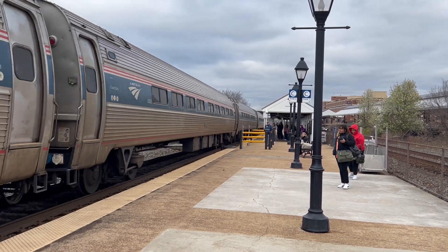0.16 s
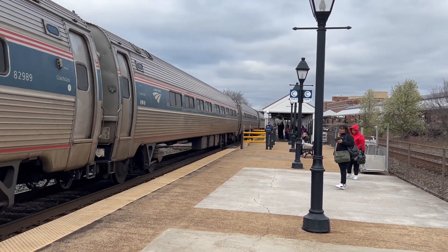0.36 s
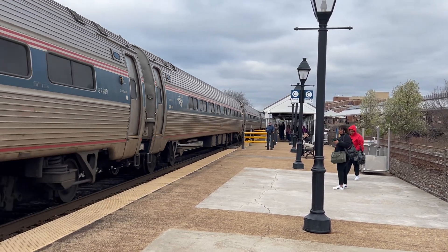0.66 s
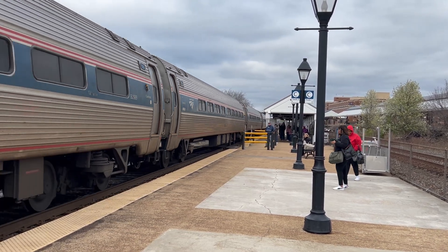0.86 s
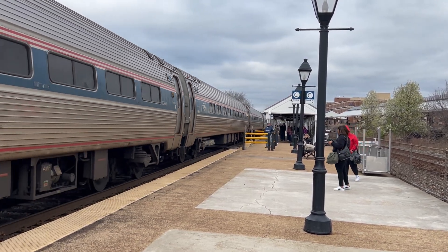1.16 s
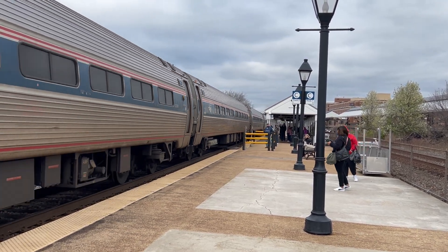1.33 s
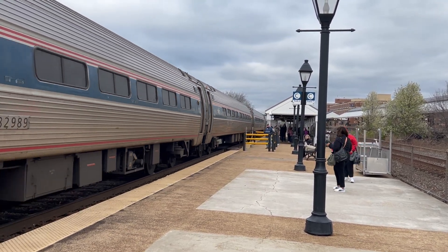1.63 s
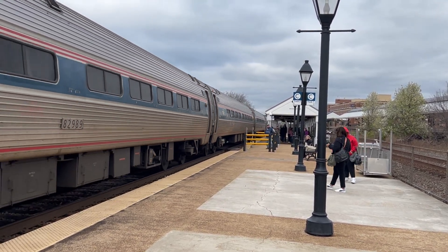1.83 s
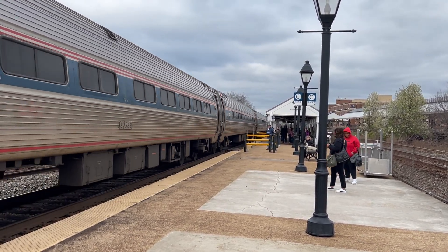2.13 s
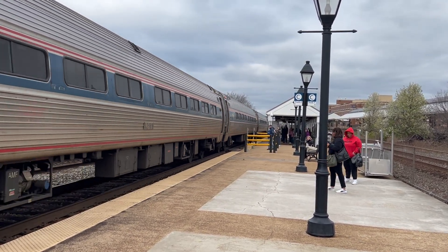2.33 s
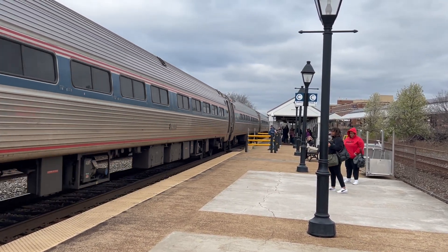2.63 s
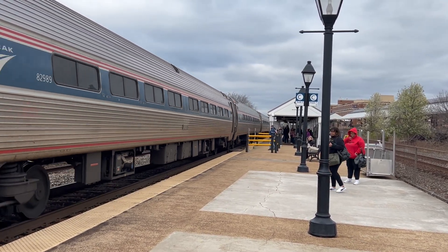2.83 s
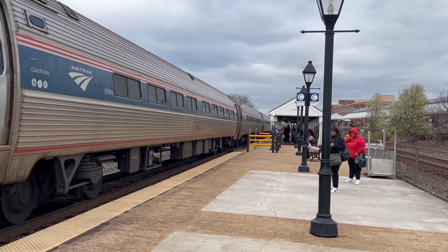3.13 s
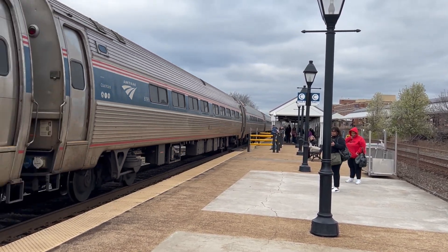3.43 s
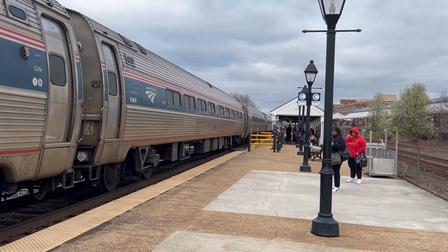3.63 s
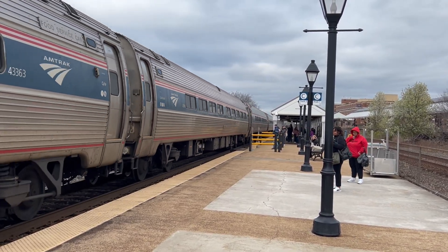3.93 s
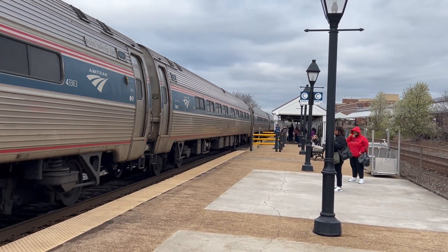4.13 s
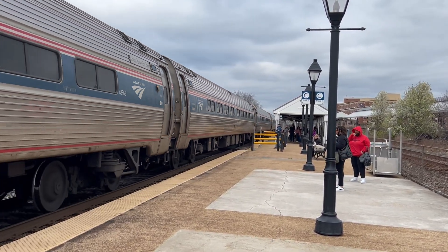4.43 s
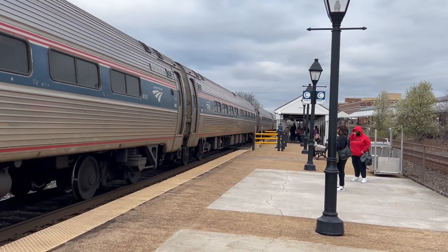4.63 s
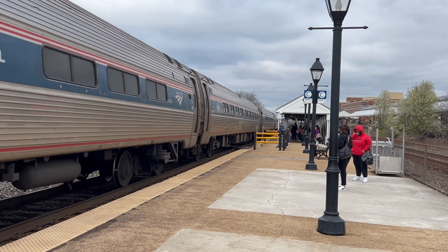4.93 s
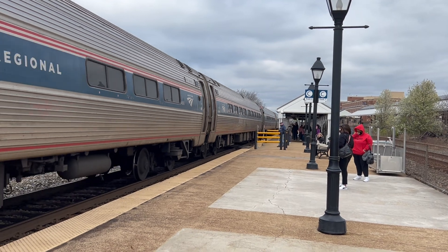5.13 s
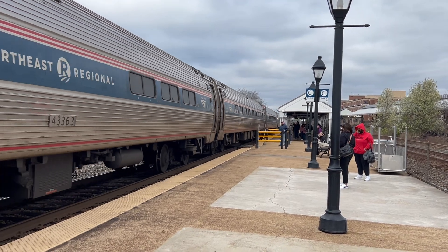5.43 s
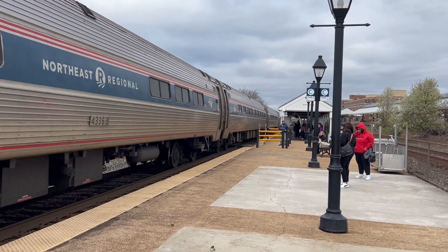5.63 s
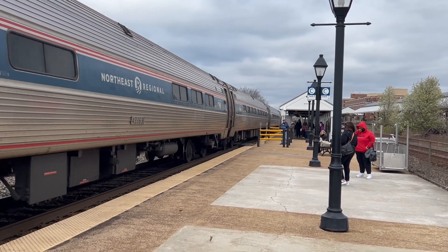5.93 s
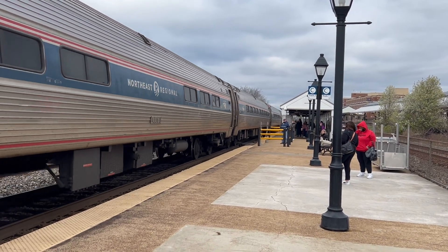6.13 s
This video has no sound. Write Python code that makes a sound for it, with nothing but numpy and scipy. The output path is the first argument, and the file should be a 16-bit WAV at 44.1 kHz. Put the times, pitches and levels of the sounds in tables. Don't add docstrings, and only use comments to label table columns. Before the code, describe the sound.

Close stereo phone pickup on an open station platform as passenger coaches roll slowly past with brakes on. From 0 s a low, two-toned groan around 350 Hz wavers over track rumble, a faint machine hum and short whistles near 13 kHz, with tiny ticks. A heavy knock falls at 0.9 s. From 1.3 s axles approach; between 1.5 and 2.7 s knocks and deep thumps crowd together, the groan swells and sings, a flange rasps, and wheels ring and hiss brightest around 2 s. After 3 s the blows thin out and rumble eases; squeal continues until about 4 s. Small steel parts rattle evenly from 3.6 to 4.2 s. At 4.3 s a brake shoe grabs with a harsh half-second-or-shorter rasp. From 4.5 s bright pads drag and scrape with brief high rings, scattered joint clunks at 5, 5.5 and 5.8 s, and a weak groan continuing to the end at 6.3 s.

```python
import sys
import numpy as np
from scipy import signal
from scipy.fft import rfft, irfft, next_fast_len
from scipy.io import wavfile
from scipy.ndimage import uniform_filter1d, map_coordinates

SR = 44100
rng = np.random.default_rng(int(sys.argv[2]) if len(sys.argv) > 2 else 0)


def int16_out(signal):
    q = np.round(np.clip(np.atleast_2d(signal).T, -1, 1) * 32767)
    wavfile.write(sys.argv[1], SR, q.astype(np.int16))


def amplitude_ratio(level_db):
    exponent = np.asarray(level_db, float) / 20
    return 10 ** exponent


N = 276948
# f/Hz, density/dB
GROUND_SPECTRUM = [(8, -90), (20, -40), (32, -28), (50, -5), (80, 0), (120, -4), (170, -11.5), (260, -48),
                   (500, -110)]
# t/s, length/s, level/dB
SHOE_GRABS = [
    (4.28, 0.19, -34),
]


def unit(x):
    return x / np.sqrt(np.mean(np.abs(x) ** 2) + 1e-20)


def along(points, hz):
    f, v = np.transpose(points)
    return np.interp(np.log(hz + 1), np.log(f + 1), v)


def curves(rows):
    s, *cols = np.transpose(rows)
    return [np.interp(np.arange(N) / SR, s, c) for c in cols]


def wobble(rate):
    return map_coordinates(rng.standard_normal(4000), [np.arange(N) * rate / SR], mode="wrap")


def filtered(x, response):
    m = next_fast_len(N + 8192)
    return irfft(rfft(x, m) * response(np.fft.rfftfreq(m, 1 / SR)), m)[..., :N]


def shape(points):
    return lambda hz: amplitude_ratio(along(points, hz))


def modes(table):
    def response(f):
        total = 0
        for k, (center, width, db) in enumerate(table):
            resonance = 1j * f * width / (center * center - f * f + 1j * f * width)
            total = total + (-1) ** k * amplitude_ratio(db) * resonance
        return total
    return response


def steep(table):
    return lambda f: modes(table)(f) ** 2


def rush(response, flutter_db=0, rate=1):
    return unit(amplitude_ratio(flutter_db * wobble(rate)) * filtered(rng.standard_normal((2, N)), response))


def fuzzy(hz, width_hz):
    swing = filtered(rng.standard_normal((4, N)), lambda f: 1 / (1 + (2 * f / width_hz) ** 2))
    turn = 2 * np.pi * np.cumsum(hz) / SR
    return unit(swing[:2] * np.cos(turn) + swing[2:] * np.sin(turn))


def mottled(x, patchy_db):
    z = signal.stft(x, nperseg=512)[2]
    field = uniform_filter1d(rng.standard_normal(z.shape[1:]), size=7, axis=0)
    field = uniform_filter1d(field, size=9, axis=1)
    return unit(signal.istft(z * amplitude_ratio(patchy_db * unit(field)), nperseg=512)[1][:, :N])


def held(rows, attack_db_s, release_db_s):
    t, gain = np.arange(N) / SR, 0
    for s, length, db in rows:
        early, late = np.clip(s - t, 0, None), np.clip(t - s - length, 0, None)
        gain = gain + amplitude_ratio(db - attack_db_s * early - release_db_s * late)
    return gain


def bursts(times, peaks_db, t60, rise):
    out, t = np.zeros(N + SR), np.arange(SR // 2) / SR
    for s, db in zip(times, peaks_db):
        out[round(s * SR):][:len(t)] += amplitude_ratio(db - 60 * t / max(t60, .01)) * (1 - np.exp(-t / rise))
    return out[:N]


def passing(column, far_db):
    # closest t/s, tread hiss level/dB, disc ring level/dB, pad scrape level/dB
    axles = [
        (1.3, -57, -49.5, -65),
        (1.63, -43, -43.5, -62),
        (2.02, -41, -36, -67),
        (2.6, -45.5, -41, -62.5),
        (3.2, -54, -49, -63),
        (3.75, -73, -51, -74),
        (4.3, -46, -42, -54.5),
        (5.0, -49, -63, -55),
        (5.5, -47, -51.5, -55.5),
    ]
    t, nearing_s, leaving_s = np.arange(N) / SR, 0.12, 0.78
    power = amplitude_ratio(2 * far_db)
    for row in axles:
        away = (t - row[0]) / np.where(t < row[0], nearing_s, leaving_s)
        power = power + amplitude_ratio(2 * row[column]) / (1 + away ** 2) ** 2
    return np.sqrt(power)


def groan():
    # t/s, first f/Hz, second f/Hz
    pad_pitch = [(0, 348, 362), (1.2, 342, 366), (1.6, 345, 357), (2.25, 332.5, 356), (2.8, 331.5, 356.5),
                 (3.5, 340, 358), (4.9, 338, 359), (6.28, 339, 350)]
    # t/s, pad pressure level/dB, first pad's part/dB, unevenness of the slip cycle/dB
    pad_grip = [(0.0, -39, 1, 1), (0.09, -29.5, 4, -3), (0.16, -38.5, 2.5, -4.5), (1.08, -33, -1.5, -7.5),
                (1.71, -28, -0.5, 2), (1.82, -29.5, -2, -1.5), (2.08, -24.5, 0, -1.5),
                (2.17, -38.5, -1, 10), (2.29, -24, -0.5, -6.5), (2.37, -22, 9, -2), (2.52, -24.5, 2, -7.5),
                (2.68, -22.5, -1.5, -8), (2.92, -29, -3, -3.5), (3.45, -33.5, -2.5, -7),
                (5.04, -34.5, 7, -3.5), (5.16, -45, -2.5, 0), (6.1, -33.5, 0.5, -6), (6.28, -37, 14, -3.5)]
    # t/s, length/s, level/dB
    bites = [
        (0, 0.99, -42.5),
        (1.25, 0.028, -38),
        (1.6, 0.052, -29.5),
        (2.34, 0.053, -30),
        (2.47, 0.17, -33.5),
        (2.72, 0.032, -35),
        (3.62, 0.16, -44),
        (4.38, 0.05, -41.5),
        (5.3, 0.065, -48.5),
        (5.5, 0.027, -58),
    ]
    # t/s, length/s, level/dB
    singing = [
        (1.24, 0.37, -44),
        (2.02, .1, -56),
        (2.35, 0.63, -44),
        (3.15, 0.25, -51.5),
        (4.25, 0.34, -60),
    ]

    def pad(hz):
        drift = np.array([.75 * wobble(6) + .2j * wobble(5) for _ in "lr"])
        slip_hz = hz + 3.5 * wobble(3)
        return np.exp(1j * (2 * np.pi * np.cumsum(slip_hz) / SR + drift))

    def fade():
        return amplitude_ratio(4 * wobble(7))

    first_hz, second_hz = curves(pad_pitch)
    first, second = pad(first_hz), pad(second_hz)
    pressure_db, part_db, uneven_db = curves(pad_grip)
    part = np.clip(amplitude_ratio(part_db), .05, .998)
    other = np.sqrt(1 - part ** 2)
    share = 1 / (1 + amplitude_ratio(10.5) * (other / part) ** 0.43)
    cycle = (share * first + (1 - share) * second) / np.hypot(share, 1 - share)
    slips = fade() * (share * first) ** 2
    slips = slips + fade() * first * second / 2
    slips = slips + fade() * ((1 - share) * second) ** 2
    octave_db = pressure_db + uneven_db
    twelfth_db = pressure_db + 0.88 * uneven_db - 12.5 + wobble(8.9)

    near = amplitude_ratio(pressure_db - 0.5) * (part * first + other * second)
    near += amplitude_ratio(octave_db - 2.0) * unit(slips.real)
    near += amplitude_ratio(twelfth_db - 2.0) * unit((cycle * second ** 2).real)
    near += held(bites, attack_db_s=163, release_db_s=143) * np.sqrt(2) * first * second
    near += held(singing, attack_db_s=120, release_db_s=82) * np.sqrt(2) * first * second ** 2
    mean_hz = (first_hz + second_hz) / 2
    far = amplitude_ratio(pressure_db - 1.5) * fuzzy(mean_hz, width_hz=43.6)
    far += amplitude_ratio(octave_db - 1) * fuzzy(2 * mean_hz, width_hz=68)
    far += amplitude_ratio(twelfth_db) * fuzzy(3 * mean_hz, width_hz=93)
    return near.real + far


def disc_squeal():
    # t/s, length/s, level/dB
    squeals = [(0.06, 0.1, -48), (.3, 0.14, -53.5), (.62, 0.15, -51.5), (.94, 0.11, -51), (1.12, 0.1, -58),
               (1.3, 0.13, -50.5), (1.54, 0.26, -50.5), (1.9, 0.17, -61), (2.24, 0.52, -47.5),
               (2.88, 0.11, -53.5), (3.44, 0.46, -50), (3.94, 0.094, -59)]
    hz = np.full(N, 13163.)
    whistle = amplitude_ratio(3.0) * fuzzy(hz, width_hz=16)
    chatter = amplitude_ratio(3.5) * fuzzy(hz - 150, width_hz=360)
    return held(squeals, attack_db_s=142, release_db_s=132) * (whistle + chatter)


def pads():
    # f/Hz, density/dB
    friction = [(400, -90), (1500, -41), (3000, -4.5), (5000, 1), (7000, 4), (9500, 2), (12300, -9),
                (14000, -10.5), (15500, -9)]
    # t/s, length/s, level/dB
    rotor_rings = [
        (4.5, 0.073, -42.5),
        (4.69, 0.059, -40),
        (5.0, 0.08, -41.5),
        (5.3, 0.06, -42),
        (5.42, 0.091, -45.5),
        (5.6, 0.042, -48),
    ]
    # t/s, length/s, level/dB
    drags = [
        (4.52, 0.13, -45.5),
        (4.93, 0.097, -50),
        (5.33, 0.11, -53),
    ]
    bright = lambda f: shape(friction)(f) * modes([(12500, 2800, 0)])(f)
    scrape = passing(column=3, far_db=-65.5) * amplitude_ratio(8.0) * mottled(rush(shape(friction), rate=15), patchy_db=3.0)
    drag = held(drags, attack_db_s=65, release_db_s=41) * rush(bright, flutter_db=1.4, rate=25)
    rotor = held(rotor_rings, attack_db_s=302, release_db_s=194) * fuzzy(6560 + 60 * wobble(8.6), width_hz=200)
    return scrape + amplitude_ratio(8.5) * drag + rotor


def grabbing_shoe():
    # f/Hz, width/Hz, level/dB
    shoe_modes = [(1510, 410, 1.5), (2770, 200, -2.5), (3800, 510, -3.5), (5270, 390, -1.5),
                  (6240, 600, -4.5), (8300, 970, -0.5), (10000, 5300, -7.5), (14900, 890, -4)]
    # first f/Hz, glide/(Hz/s), level/dB
    bending = [(3850, 750, -50), (5480, -1100, -51), (8300, -2600, -49), (1720, -1100, -43)]
    out = held(SHOE_GRABS, attack_db_s=750, release_db_s=248) * rush(steep(shoe_modes), rate=45)
    (s, length, _), = SHOE_GRABS
    since = np.clip(np.arange(N) / SR - s, 0, length)
    for hz, glide, db in bending:
        gain = held([(s, length, db)], attack_db_s=600, release_db_s=200)
        out = out + gain * fuzzy(hz + glide * since, width_hz=90)
    return out


def wheel_rings():
    # f/Hz, width/Hz, level/dB
    disc_modes = [(3870, 140, -13), (4506, 180, -1.5), (6243, 220, -4.5), (8010, 260, -7),
                  (10720, 450, -2.5), (11540, 350, -8.5), (14460, 450, -3.5)]
    ahead = (2.0 - np.arange(N) / SR) / .5
    doppler = 1.003 + .01 * ahead / np.hypot(1, ahead)
    ring = 0
    for hz, width_hz, db in disc_modes:
        swell = amplitude_ratio(1.2 * wobble(3) + 2.6 * wobble(18))
        waver = 1 + .005 * wobble(9)
        ring = ring + amplitude_ratio(db) * swell * fuzzy(hz * doppler * waver, width_hz)
    grit = rush(steep([(5200, 4500, 0), (13000, 5000, -5)]), flutter_db=1.6, rate=16)
    ring = ring + amplitude_ratio(-1.0) * mottled(grit, patchy_db=2.5)
    return passing(column=2, far_db=-55.5) * amplitude_ratio(-4.0) * ring


def flange():
    # t/s, length/s, level/dB
    rasps = [
        (1.61, 0.07, -38.5),
        (1.77, 0.13, -67),
        (1.922, 0.47, -42),
    ]
    # f/Hz, width/Hz, level/dB
    flange_modes = [(2755, 92, 7.5), (3180, 370, 3.5)]
    # t/s, length/s, level/dB
    catches = [(0.0, 0.039, -35), (.3, 0.21, -52), (.75, 0.047, -44), (1.05, 0.21, -47), (1.5, 0.18, -36.5),
               (2.0, 0.17, -39), (2.4, 0.73, -41.5), (3.2, 0.09, -44), (3.6, 0.18, -47.5), (4.3, 0.47, -46),
               (5.25, 0.21, -48), (5.59, 0.068, -40), (5.7, 0.089, -52), (5.9, 0.25, -46.5),
               (5.05, 0.11, -48)]
    # t/s, length/s, level/dB
    strays = [
        (1.95, 0.6, -46.5),
        (2.9, 0.069, -45),
        (3.22, 0.095, -45),
    ]
    rough = amplitude_ratio(-3.0) * rush(steep(flange_modes), flutter_db=3.0, rate=30)
    rasp = held(rasps, attack_db_s=300, release_db_s=48) * rough
    tone = amplitude_ratio(-8.0) * fuzzy(2800 + 50 * wobble(11), width_hz=70)
    rasp += held(rasps, attack_db_s=300, release_db_s=60) * tone
    caught_hz = 1695 + 55 * np.exp(-(np.arange(N) / SR - 1.5) ** 2 / .04)
    caught = held(catches, attack_db_s=107, release_db_s=110) * amplitude_ratio(-4.5) * fuzzy(caught_hz, width_hz=25)
    stray = held(strays, attack_db_s=75, release_db_s=97) * fuzzy(1850 + 45 * wobble(5.4), width_hz=100)
    return rasp + caught + stray


def joints():
    # t/s, peak level/dB, deep push/dB, sharpness/dB
    joint_hits = [(0.905, -18, 12, -13), (1.33, -46, 1, 8), (1.549, -17, -20, -19), (1.803, -19, 13, -9),
                  (1.978, -17, -12, 0), (2.065, -8.5, 4, -34), (2.094, -12.5, 0, -16),
                  (2.153, -13.5, 4, -11), (2.275, -12.5, -17, -8), (2.368, -17, -18, -20),
                  (2.647, -12.5, 2.5, -30), (2.671, -13, -27, -2.5), (2.681, -26, -23, -3),
                  (2.797, -15.5, -25, -13), (2.923, -22, -22, -2), (3.062, -34, -28, 14),
                  (3.0674, -18.5, -30, 6), (3.189, -17.5, -7, -15), (3.477, -23.5, -37, 11),
                  (3.896, -26, -25, 5), (4.2, -47, 10, -23), (4.559, -22, -1, -12), (4.975, -29, 2, -16),
                  (5.019, -18, -20, -18), (5.041, -24, -17, -15), (5.064, -22, 0, -11),
                  (5.117, -20, -12, -15), (5.149, -30, 10, -3), (5.504, -20, 4, -15), (5.798, -20, 4, -23)]
    # f/Hz, density/dB
    knock_spectrum = [(50, -83), (120, -8), (190, 7), (500, -0.5), (800, -12.5), (1100, -9), (2500, -100)]
    # f/Hz, density/dB
    clank_spectrum = [(300, -80), (800, -25), (1100, -9), (1400, 10), (2000, 7), (2600, -18), (6000, -80)]
    swings_s = [0, .013, .029, .052]
    s, db, deep, sharp = np.transpose(joint_hits)
    t60_s = 0.094
    knock = bursts(s, db - 3.0, t60_s, rise=0.0015) * rush(shape(knock_spectrum))
    push = bursts(s, db + deep - 4.0, 0.64 * t60_s, rise=0.014) * rush(shape(GROUND_SPECTRUM))
    ring_db = db - 12 + 0.47 * sharp
    ring = bursts(s, ring_db, 0.98 * t60_s, rise=0.0018) * rush(shape(clank_spectrum))
    blows = np.bincount(np.round(s * SR).astype(int), amplitude_ratio(db + sharp + 22.5), N) * [[1], [.6]]
    at = s[:, None] + np.array(swings_s) * rng.uniform(.8, 1.2, (len(s), 4))
    size = amplitude_ratio(db + deep + 27)[:, None] * [1, -.8, .6, -.5]
    thuds = np.bincount(np.round(at * SR).astype(int).ravel(), size.ravel(), N) * [[1], [.4]]
    push += filtered(thuds, steep([(120, 170, 0)]))
    return knock + push + ring + filtered(blows, steep([(520, 700, 0)]))


def thumps():
    # loudest t/s, peak level/dB, f/Hz
    thump_hits = [(0.841, -16, 390), (0.928, -16, 91), (1.352, -12.5, 94), (1.401, -15, 390),
                  (1.527, -12.5, 310), (1.56, -17, 201), (1.685, -16, 100), (1.799, -8, 99),
                  (1.812, -7.5, 267), (1.847, -19, 160), (1.895, -13, 99), (1.919, -9.5, 343),
                  (1.934, -6, 620), (1.981, -9, 620), (2.004, -25, 110), (2.037, -11, 312),
                  (2.07, -11, 353), (2.086, -7.5, 353), (2.103, -7.5, 109), (2.151, -7, 123),
                  (2.168, -26, 620), (2.274, -16, 89), (2.301, -9, 550), (2.332, -14, 550),
                  (2.368, -25, 620), (2.438, -17.5, 140), (2.651, -11, 320), (2.675, -7.5, 307),
                  (2.686, -16, 520), (2.797, -22, 497), (3.0695, -10.5, 320), (3.364, -16, 142),
                  (3.485, -18, 600), (3.907, -19.5, 630), (3.908, -21, 98), (3.966, -16.5, 139),
                  (4.206, -17.5, 113), (4.391, -20, 230), (4.353, -17, 141), (4.564, -15, 314),
                  (4.578, -16, 348), (4.654, -20.5, 110), (4.98, -17, 140), (5.02, -19, 230),
                  (5.043, -15.5, 630), (5.053, -21, 260), (5.066, -19, 403), (5.075, -20, 79.6),
                  (5.122, -23, 620), (5.156, -20, 487), (5.159, -24, 100), (5.538, -19.5, 487),
                  (5.8, -33, 70), (5.822, -21, 199), (5.776, -27, 300), (1.98, -20, 750), (2.682, -22, 750),
                  (3.064, -16, 716), (3.85, -21.5, 65), (5.299, -32, 89)]
    rise_cycles, fall_cycles = 0.56, 0.61
    out, t = np.zeros(N + SR), np.arange(-SR // 20, SR // 10) / SR
    for s, db, hz in thump_hits:
        cycles = t * hz
        swing = np.exp(-.5 * (cycles / np.where(t < 0, rise_cycles, fall_cycles)) ** 2)
        thump = amplitude_ratio(db - 2) * swing * np.sin(2 * np.pi * (.125 - cycles))
        out[round(s * SR) - SR // 20:][:len(t)] += thump
    return out[:N] * np.array([[1], [0]])


def ticks():
    # t/s, peak level/dB, brightness/dB
    loose = [
        (0.0794, -52, -16),
        (0.2478, -41, -22),
        (0.6569, -42, -25),
        (0.6928, -47, 9),
        (0.7094, -47, -16),
        (1.6194, -38, -30),
    ]
    beats = [0, 1, 2, 3, 5, 6]
    rattle = []
    for beat in beats:
        third = beat % 3 == 0
        rattle.append((3.6172 + .1003 * beat, -37 + 0.5 * third, -8 + 1.0 * third))
    s, db, bright = np.transpose(loose + rattle)
    t60_s = 0.12
    low = bursts(s, db + 0.5, t60_s, rise=0.00091) * rush(modes([(3650, 640, 0), (6540, 1000, 0)]))
    high = bursts(s, db + bright, t60_s, rise=.0015) * rush(steep([(8800, 5000, 0)]))
    return low + high


def treads():
    # f/Hz, density/dB
    tread_spectrum = [(200, -84), (600, 3), (1200, -0.5), (2000, -4), (3200, -4), (5500, -9), (7500, -17),
                      (10000, -55), (12500, -12), (15000, -42)]
    # f/Hz, width/Hz, level/dB
    web_modes = [(1406, 54, 16), (2040, 590, 0), (2810, 400, 3.5)]
    hiss = amplitude_ratio(3.5) * mottled(rush(shape(tread_spectrum), flutter_db=.5, rate=12), patchy_db=2.0)
    web = rush(modes(web_modes), flutter_db=.5, rate=2.8)
    return passing(column=1, far_db=-47.5) * (hiss + web)


def rumble():
    # t/s, ground rumble level/dB
    load = [(0.0, -32), (0.8, -31.5), (0.93, -22), (1.02, -29), (1.4, -28), (2.12, -21), (2.22, -28.5),
            (2.4, -27.5), (2.56, -36.5), (2.95, -37), (3.35, -31), (3.88, -34), (4.05, -33), (4.64, -36),
            (4.79, -39.5), (5.05, -36.5), (5.22, -38), (6.28, -37.5)]
    # t/s, length/s, level/dB
    surges = [
        (1.42, .06, -26),
        (1.85, .08, -26),
        (2.1, .06, -25),
        (2.24, 0.17, -26.5),
        (3.82, .09, -31),
        (4.58, .04, -36),
        (5.78, .05, -33.5),
    ]
    # f/Hz, density/dB
    body_spectrum = [(30, -110), (90, -46), (160, -3), (260, -2), (450, -6.5), (600, -13), (900, -18.5),
                     (1250, -21.5), (2000, -17), (4000, -110)]
    # t/s, length/s, level/dB
    roars = [
        (1.45, 1, -33.5),
    ]
    load_db, = curves(load)
    ground = amplitude_ratio(load_db) * rush(shape(GROUND_SPECTRUM), flutter_db=1.5, rate=14)
    heave = rush(steep([(62, 50, 0)]), flutter_db=0.5, rate=12)
    ground += held(surges, attack_db_s=200, release_db_s=200) * heave
    body_db = -31.5 + 0.51 * (load_db + 27)
    body = amplitude_ratio(body_db) * rush(shape(body_spectrum), flutter_db=1.5, rate=18)
    roar = rush(shape(body_spectrum), flutter_db=1.5, rate=32)
    body += held(roars, attack_db_s=45, release_db_s=55) * roar
    return ground + body


def machines():
    # t/s, length/s, level/dB, f/Hz
    hums = [
        (0, 1.4, -46.5, 469.6),
        (4.61, 0.13, -45.5, 471),
        (6.12, 0.077, -43.5, 440),
    ]
    sway = 1.1 * wobble(7) + .4 * np.array([wobble(4), wobble(4)])
    t, out = np.arange(N) / SR, 0
    for s, length, db, hz in hums:
        gain = held([(s, length, db + 6.5)], attack_db_s=79, release_db_s=22)
        out = out + gain * np.sin(2 * np.pi * hz * t + sway)
    return out


def moving(pair, lead_ms, alike):
    turn = np.arccos(alike) / 2
    common, opposite = pair * [[np.cos(turn)], [np.sin(turn)]]
    half = lead_ms * SR / 2000
    left = map_coordinates(common + opposite, [np.arange(N) + half], mode="nearest")
    right = map_coordinates(common - opposite, [np.arange(N) - half], mode="nearest")
    return np.array([left, right])


def phone_ports(train):
    # f/Hz, likeness (0 to 1)
    likeness = [(40, 1), (180, 0.56), (340, 0.49), (640, 0.6), (1300, 0.47), (1800, 0.87), (3500, 0.49),
                (8700, 0.95)]
    # f/Hz, lead/turns
    phase_lead = [(250, 0), (860, -.21), (1250, -.46), (1600, -.64), (1690, -1.04), (7300, -.99),
                  (9850, -.5), (12800, 0), (13500, .04), (15600, .5)]
    # f/Hz, left over right level/dB
    body_shadow = [(200, 0), (1000, -0.7), (1400, -1.5), (1600, -9.5), (1700, 2), (2200, 0.5), (4000, 0.5),
                   (6000, 3), (7000, 0)]
    half = np.array([[.5], [-.5]])

    def spread(hz):
        tight = 1 - .85 * (np.exp(-((hz - 9850) / 800) ** 2) + (hz > 15100))
        turn = tight * np.arccos(np.clip(along(likeness, hz), 0, 1)) / 2
        return np.array([np.cos(turn), np.sin(turn)])

    def body(hz):
        lead = np.interp(hz, *np.transpose(phase_lead))
        return amplitude_ratio(half * along(body_shadow, hz)) * np.exp(-2j * np.pi * half * lead)

    common, opposite = filtered(train, spread)
    return filtered(np.array([common + opposite, common - opposite]), body)


def scene():
    # t/s, groaning axle/ms, axle boxes/ms
    bearings = [(0, .3, 0), (1.0, .4, -.2), (1.75, .38, -.5), (2.3, .3, -.5), (2.8, .2, -.1),
                (3.3, .12, .2), (3.8, .05, .15), (5.3, .03, 0), (6.28, .12, .2)]
    brakes = disc_squeal() + pads() + grabbing_shoe()
    wheels = wheel_rings() + flange() + treads()
    train = brakes + wheels + joints() + ticks() + rumble() + machines()
    groan_ms, thump_ms = curves(bearings)
    tilt = amplitude_ratio(np.array([[.5], [-.5]]) * 0.69)
    axles = tilt * moving(groan(), groan_ms, alike=.8) + moving(thumps(), thump_ms, alike=.8)
    return phone_ports(train) + axles


def gated(x, edge_hz, open_db):
    top = filtered(x, lambda hz: hz > edge_hz)
    loudness = np.abs(uniform_filter1d(np.mean(top ** 2, axis=0), size=3072))
    return x - top / (1 + (loudness / amplitude_ratio(2 * open_db)) ** 6)


def low_pass(x):
    return signal.sosfilt(signal.butter(12, 15690, fs=SR, output="sos"), x)


def record(dry):
    wide = filtered(dry, lambda hz: 1 / (1 + (hz / 15600) ** 80))
    kept = gated(wide, edge_hz=15200, open_db=-58.3)
    kept = gated(kept, edge_hz=13900, open_db=-59)
    return low_pass(kept)


dry = scene()
out = record(dry)
int16_out(out)
```